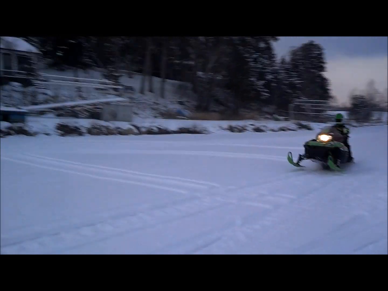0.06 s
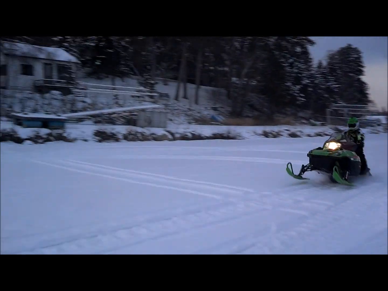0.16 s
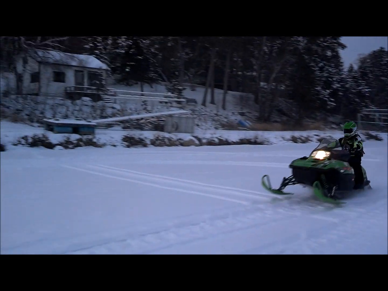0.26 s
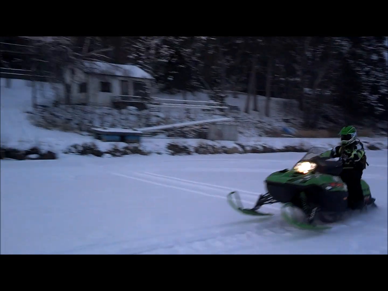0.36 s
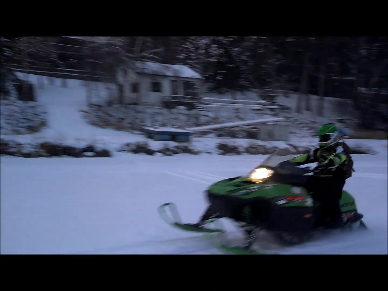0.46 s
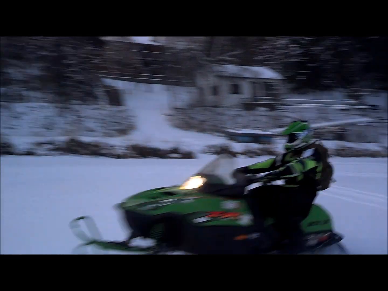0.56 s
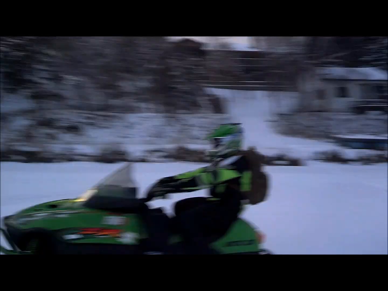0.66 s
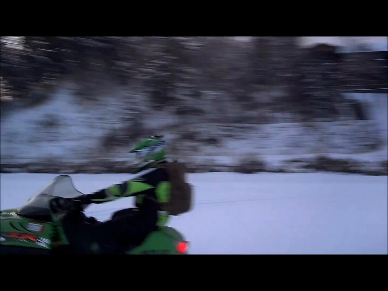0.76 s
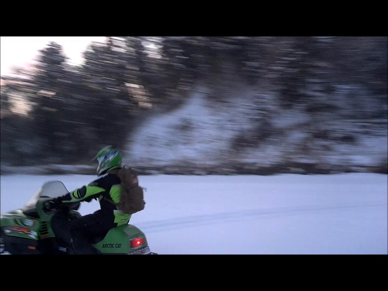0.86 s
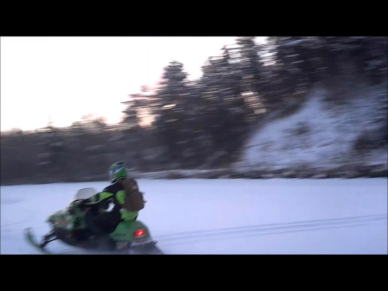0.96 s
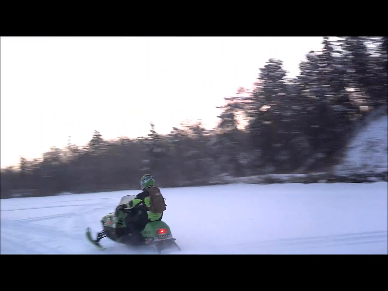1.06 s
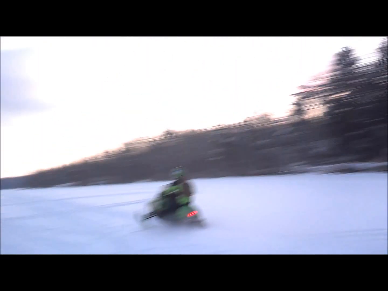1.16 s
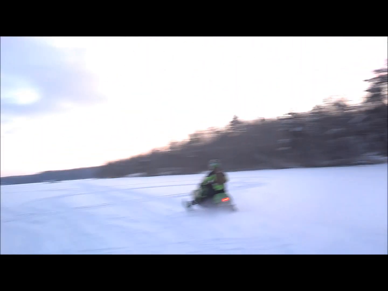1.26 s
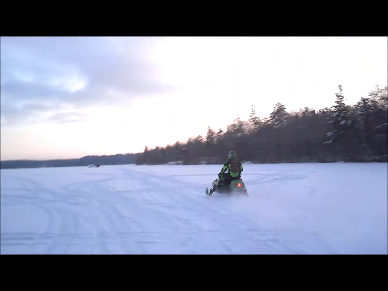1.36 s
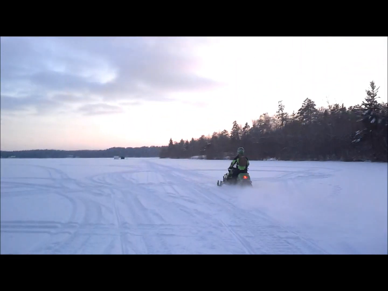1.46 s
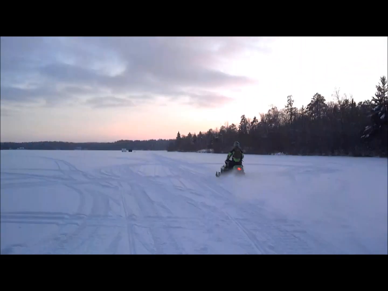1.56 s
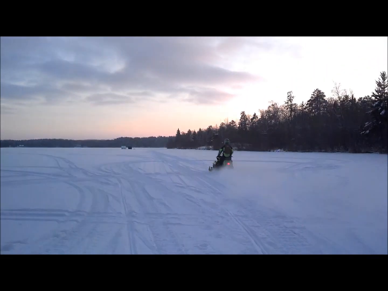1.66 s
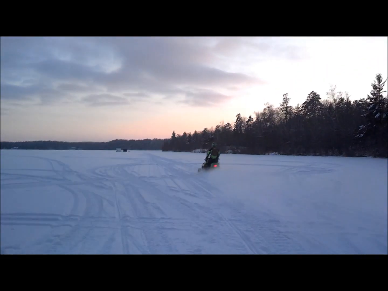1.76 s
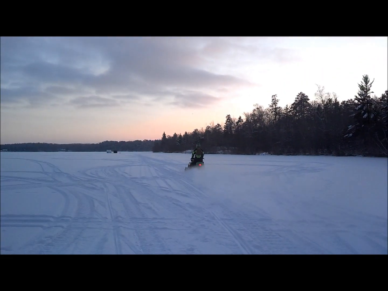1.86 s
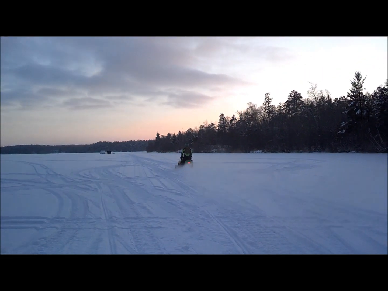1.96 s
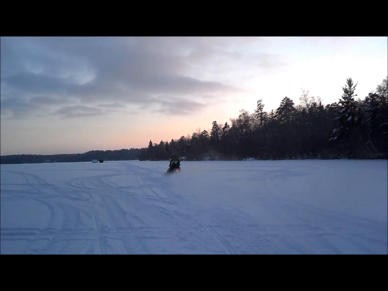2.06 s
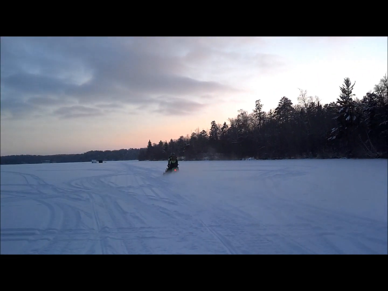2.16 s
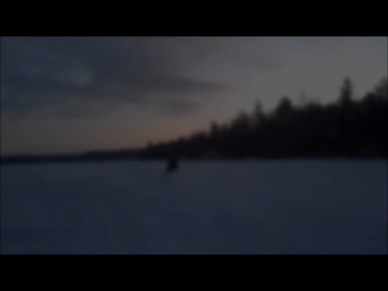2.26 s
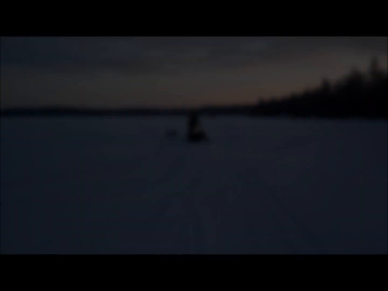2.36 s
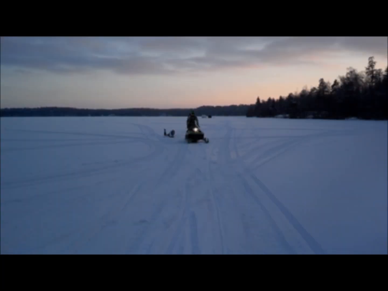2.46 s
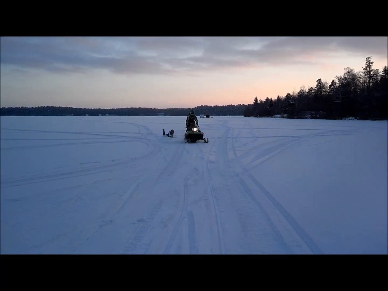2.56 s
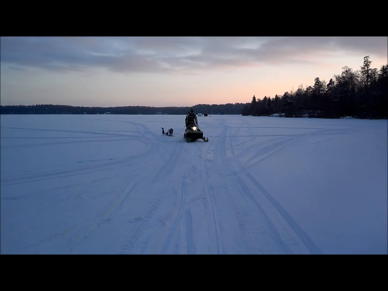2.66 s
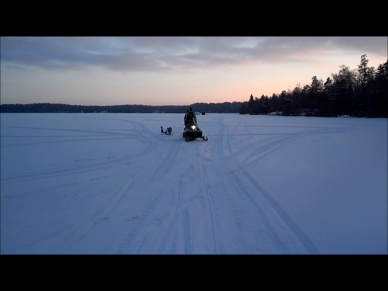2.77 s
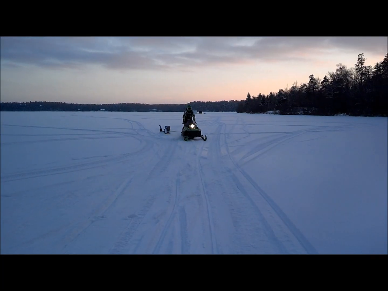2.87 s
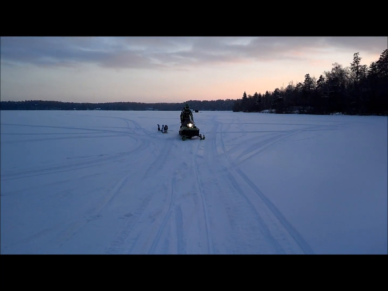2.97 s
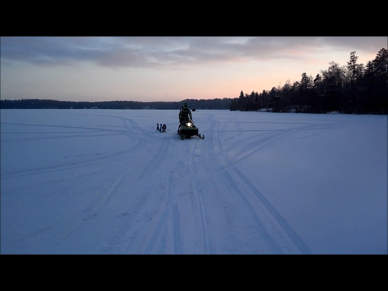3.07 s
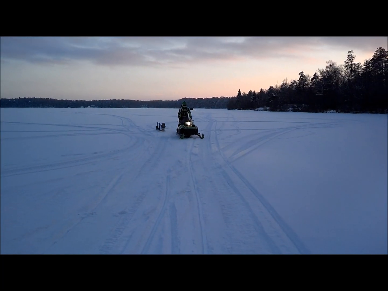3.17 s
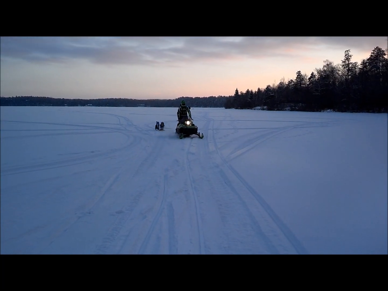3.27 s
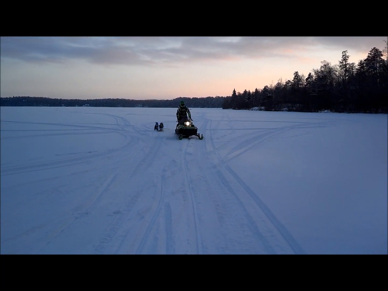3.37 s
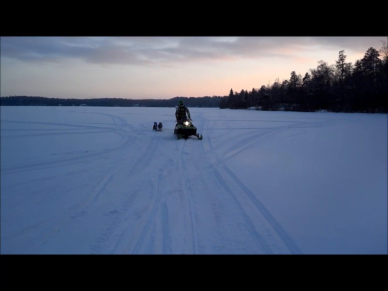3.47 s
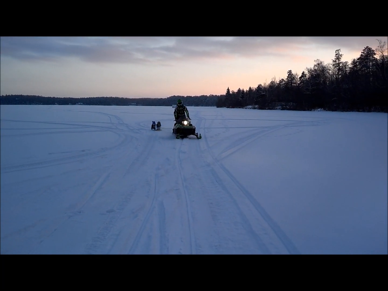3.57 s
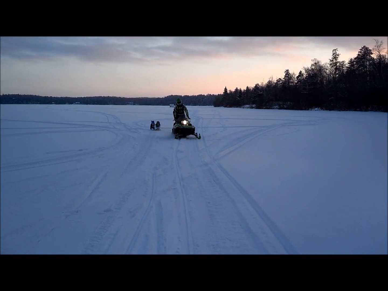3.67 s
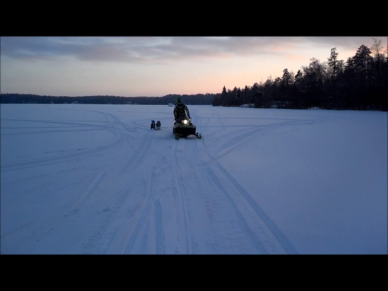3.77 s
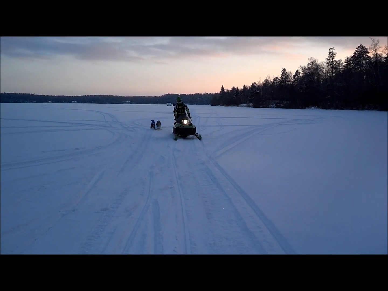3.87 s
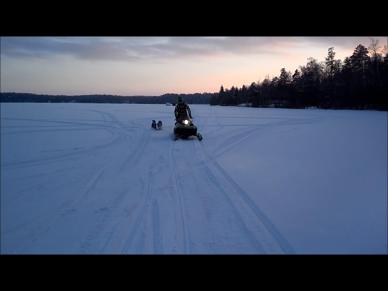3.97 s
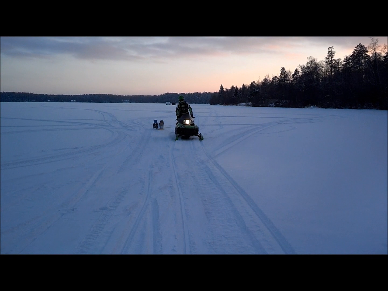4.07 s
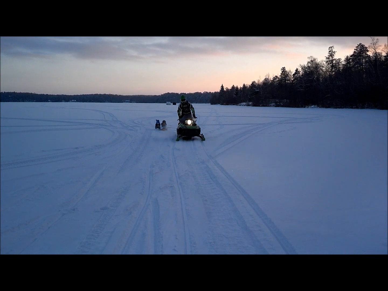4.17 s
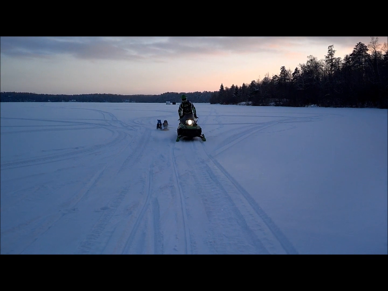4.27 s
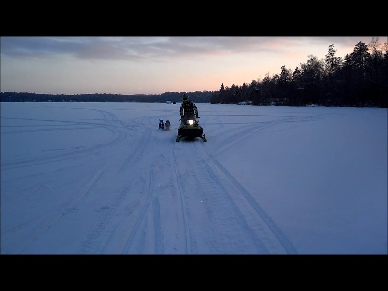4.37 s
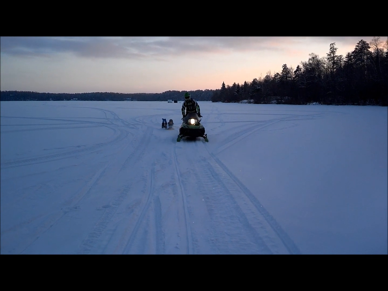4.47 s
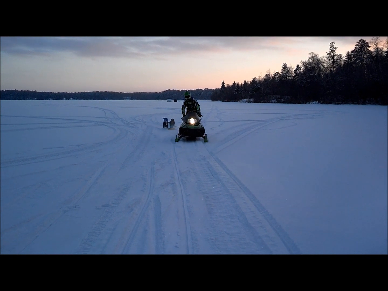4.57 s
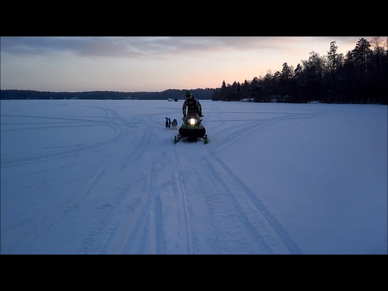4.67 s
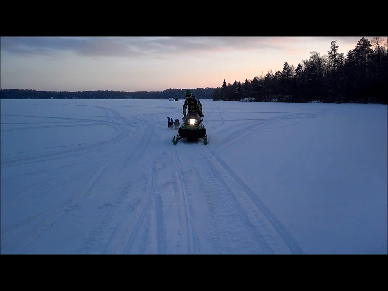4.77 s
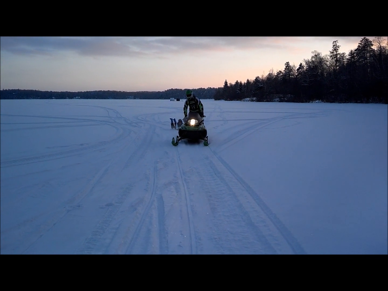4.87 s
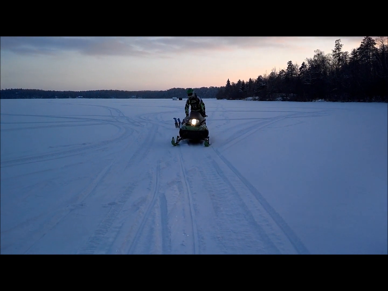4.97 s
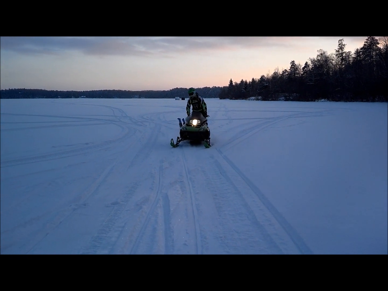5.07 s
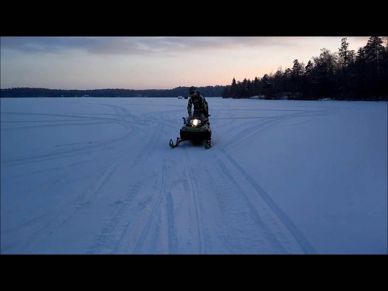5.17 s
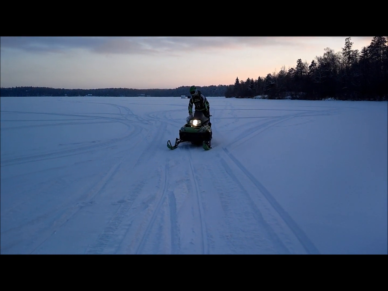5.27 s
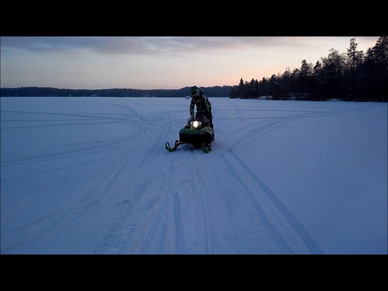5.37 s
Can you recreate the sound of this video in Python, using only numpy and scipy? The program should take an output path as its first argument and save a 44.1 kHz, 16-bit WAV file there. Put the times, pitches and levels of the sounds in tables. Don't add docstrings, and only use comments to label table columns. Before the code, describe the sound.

Raspy two-stroke snowmobile roars close by with spraying snow, runs down into the distance, then a hard cut to a lower, slightly stuttering engine hum.

```python
import sys
import numpy as np
from scipy import signal
from scipy.fft import rfft, irfft, next_fast_len
from scipy.io import wavfile

SR = 44100
rng = np.random.default_rng(int(sys.argv[2]) if len(sys.argv) > 2 else 0)


def convert_level_to_amplitude(level_db):
    exponent = np.asarray(level_db, float) / 20
    return 10 ** exponent


def unload_wav(signal):
    wavfile.write(
        sys.argv[1],
        SR,
        np.round(np.clip(np.atleast_2d(signal).T, -1, 1) * 32767).astype(np.int16),
    )


N = 239010
CHANGE_S = 2.297

# t/s, f/Hz
PASS_FIRING = [
    (0, 292.6),
    (.1, 291.2),
    (.4, 290.9),
    (.6, 287.7),
    (.7, 282.4),
    (.9, 269),
    (1.1, 260.5),
    (1.31, 254.4),
]
# approaching level/dB, faces from t/s, until t/s, facing level/dB, receding level/dB
OUTLETS = [
    (-32, 0.47, 0.58, -25.5, -29),
    (-41, 0.41, 0.68, -26.5, -38.5),
    (-28.5, 0.58, 0.74, -20.5, -37),
    (-26.5, 0.38, 0.69, -23.5, -38),
]
# order, level/dB against the near roar
BRIGHT_ORDERS = [(9, 2.5), (11, -2.5), (13, -1), (14.5, -12), (17, -6), (19, -8.5), (22, -9), (30, -17),
                 (38, -23)]
# f/Hz, level/dB per Hz
NEAR_ROAR = [(45, -93.5), (80, -66), (130, -71), (200, -58), (350, -60), (600, -68), (1000, -61),
             (1500, -70.5), (2300, -58), (3500, -59.5), (5500, -70), (8500, -71.5), (12000, -75),
             (15500, -74)]


def full_throttle():
    time, per_s = in_time(PASS_FIRING, tail_s=.1)
    steady_db, abreast_s, fall_db_per_s, wake_db = -31, 0.71, 27.5, -39.5
    near_db = np.clip(steady_db - fall_db_per_s * (time - abreast_s), wake_db, steady_db)
    swing_in_s, swing_out_s = 0.2, 0.24
    first_db, low_db, middle_db, upper_db = [
        np.interp(time, [s - swing_in_s, s, end, end + swing_out_s], [before, top, top, after])
        for before, s, end, top, after in OUTLETS]
    ice_dip_db = -5 * bell(time, centre_s=1.065, width_s=0.089)
    middle_db = middle_db + ice_dip_db
    upper_db = upper_db + ice_dip_db
    phase = turning(per_s, jitter=0.028)
    passed = np.interp(time, [.55, .75], [0, 1])
    abreast = np.interp(time, [.44, .56], [0, 1])
    receding = np.interp(time, [.72, .9], [0, 1])
    early = np.minimum(time, .4)

    pan_db = 9 - 17 * bell(time, centre_s=0.61, width_s=0.15)
    port_gain = convert_level_to_amplitude((pan_db - 12) * np.array([[.5], [-.5]]))
    lag = np.array([[0], [1.1]])
    boom = np.sqrt(2) * convert_level_to_amplitude(first_db + 2.5) * np.sin(phase - lag) * port_gain

    low = [(2, low_db - 3.5 + 9.5 * passed - 6 * (time > .87)),
           (3, low_db + 4.5 - 0.77 * passed),
           (4, middle_db - 5.0 + 14 * early - 4 * abreast),
           (5, middle_db + 5.5 - 11 * early + 3.3 * abreast),
           (6, upper_db + 3.5),
           (7, upper_db + 2.0 + 3 * abreast),
           (8, upper_db)]
    high = [(k, near_db - 2.2 * passed + at_hz(BRIGHT_ORDERS, k)) for k in range(9, 38)]
    halves = [(k + .5, near_db - 26 - 0.19 * k + 12 * passed + 11 * receding) for k in range(5)]
    cracks = orders(phase, low, waver_db=1.8, apart=0.43)
    cracks = cracks + orders(phase, high, waver_db=3.0, apart=0.021)
    cracks = cracks + orders(phase, halves, waver_db=4.0)
    cracks = cracks * convert_level_to_amplitude(1.08 * drift(130, size=len(time)))

    spray = roar(time, NEAR_ROAR, 2860, 5200, patchy_db=1.76, apart=0.032)
    hiss = convert_level_to_amplitude(near_db) * puffs(phase, depth=0.21) * spray
    engine = (boom + cracks) * fade(time, -1, 1.322, fade_s=0.012)
    return time, engine + hiss * fade(time, -1, 1.37, fade_s=0.22)


# t/s, f/Hz
TOW_FIRING = [(2.3, 151.8), (2.6, 152.8), (3.1, 154.6), (3.55, 156.2), (3.96, 155.5), (4.28, 152),
              (4.85, 151.6), (5.15, 153.5), (5.43, 154)]
# t/s, share of the boom lost [0-1]
WEAK_FIRINGS = [(2.373, 0.7), (2.554, .65), (2.647, 0.7), (2.711, 0.7), (2.841, .48), (2.959, 0.3),
                (3.017, 0.8), (3.085, .56), (3.143, .93), (3.241, 0.6), (3.384, 0.5), (3.498, 0.3),
                (3.691, .4), (3.87, .6), (4.142, .43), (4.199, .6), (4.252, 0.9), (4.301, .4), (4.42, .6),
                (4.535, 1), (4.607, 0.6), (4.658, .4), (4.736, 0.75), (4.79, 1), (4.855, .45), (4.906, 0.3),
                (4.998, 0.7), (5.2, 0.5), (5.296, 0.3)]
# order, level/dB against the 3rd
TOW_ORDERS = [(2, -10), (3, 1), (4, -10.5), (5, -11), (6, -7.5), (7, -12.5), (8, -27), (9, -7.5), (10, -6),
              (11, -6), (12, -7), (13, -9), (14, -10.5), (16, -20.5), (18, -57), (19, -14.5)]
# f/Hz, level/dB per Hz
COWL_ROAR = [(45, -80), (80, -68), (130, -63), (200, -51.5), (260, -72.5), (400, -73), (700, -70),
             (1100, -68), (1450, -61.5), (1700, -59), (1900, -64.5), (2200, -62.5), (2900, -86),
             (4000, -93)]
# f/Hz, level/dB per Hz
SKI_HISS = [(1500, -92), (2600, -79), (3500, -76), (5000, -82), (6000, -79.5), (8500, -88.5), (12000, -100),
            (15500, -122)]


def towing():
    time, per_s = in_time(TOW_FIRING, lead_s=.02)
    since = time - CHANGE_S
    boom_db = -24.5 + 0.17 * since
    third_db = -41.5 + 0.79 * since
    roar_db = -32.5 + 0.58 * since
    hiss_db = -49 + 1.05 * since
    rut_db = 3.5 * bell(time, centre_s=2.52, width_s=0.069)
    boom_db = boom_db - rut_db
    roar_db = roar_db + rut_db

    phase = turning(per_s, jitter=0.0064)
    firing = convert_level_to_amplitude(0.73 * drift(19, size=len(time)))
    for s, lost in WEAK_FIRINGS:
        start = max(round((s - time[0] - .06) * SR), 0)
        near = slice(start, round((s - time[0] + 0.053) * SR))
        x = ((time[near] - s) / 0.0078) ** 2
        firing[0, near] *= 1 - lost * (1.13 * np.exp(-x / 2) - 0.37 * np.exp(-x / 12))
    boom = np.sqrt(2) * convert_level_to_amplitude(boom_db + 1.5) * firing * np.sin(phase)
    stack = orders(phase, TOW_ORDERS[:5], waver_db=-0.3, apart=0.35)
    stack = stack + orders(phase, TOW_ORDERS[5:], waver_db=1.1, apart=0.38)
    stack = convert_level_to_amplitude(third_db + 3.0) * stack
    lugs = convert_level_to_amplitude(boom_db - 21) * orders(turning(per_s * 1.35, jitter=0.25), [(1, 0)], waver_db=2)
    cowl = roar(time, COWL_ROAR, 1060, 2450, patchy_db=0.75, apart=0.014)
    cowl = convert_level_to_amplitude(roar_db - 2.0) * puffs(phase, depth=0.11) * cowl
    skis = roar(time, SKI_HISS, 3444, 4330, patchy_db=0.64, apart=0.011)
    skis = convert_level_to_amplitude(hiss_db - 1.5) * puffs(phase, depth=0.092) * skis
    return time, (boom + stack + lugs + cowl + skis) * fade(time, CHANGE_S - .001, 9, fade_s=.001)


# t/s, f/Hz, level/dB
COAST = [
    (1.3, 255, -65),
    (1.34, 266, -59),
    (1.45, 225, -46.5),
    (1.6, 181, -46),
    (1.75, 179, -45),
    (1.95, 159, -42.5),
    (2.297, 173, -44),
]
# order, level/dB
COAST_ORDERS = [(1, 8), (2, -24)]


def coasting():
    return hum(COAST, COAST_ORDERS, jitter=0.29, waver_db=1.5)


# t/s, f/Hz, level/dB
CLUTCH = [
    (1.33, 792, -56),
    (1.39, 772, -38.5),
    (1.46, 726, -37),
    (1.52, 687, -49),
    (1.6, 642, -67),
]
# multiple, level/dB
CLUTCH_ORDERS = [(1, -1), (1.798, -1.5)]


def clutch_whine():
    return hum(CLUTCH, CLUTCH_ORDERS, jitter=0.2, waver_db=1.0)


# t/s, f/Hz, level/dB
TRACK = [
    (.2, 187, -55),
    (.6, 165, -38.5),
    (.95, 185, -34.5),
    (1.1, 174, -46.5),
    (1.3, 175, -36),
    (1.42, 166, -39),
    (1.8, 159, -43),
    (2.297, 155, -48.5),
]
# order, level/dB
TRACK_ORDERS = [(1, -2.5), (2, -1), (4, -14)]


def track_lugs():
    return hum(TRACK, TRACK_ORDERS, jitter=0.029, waver_db=2.5)


# t/s, peak level/dB, ring f/Hz, t60/s
KNOCKS = [
    (0.104, -44, 150, .06),
    (0.398, -30, 177, 0.058),
    (2.5, -32, 270, .07),
    (2.546, -31, 300, 0.055),
    (2.717, -15.5, 1570, 0.014),
    (4.043, -25, 1630, 0.019),
    (4.68, -31, 885, .06),
    (4.96, -28.5, 840, .06),
]


def knocks():
    out = np.zeros(N)
    for s, db, hz, t60 in KNOCKS:
        after = np.arange(round(t60 * SR)) / SR
        thud = convert_level_to_amplitude(db - 60 * after / t60) * np.sin(2 * np.pi * hz * after)
        out[round(s * SR):][:len(after)] += thud
    return np.arange(N) / SR, out


# t/s, f/Hz, level/dB
SHORE = [
    (1.25, 250, -47),
    (1.36, 256, -44),
    (1.5, 233, -49),
    (1.7, 243, -50),
    (2.297, 252, -62),
]
# order, level/dB
SHORE_ORDERS = [(1, 2.5), (3, -11), (5, -3.5), (6, 4), (7, -21), (8, -2)]


def far_shore():
    return hum(SHORE, SHORE_ORDERS, jitter=0.21, waver_db=3.5)


# f/Hz, level/dB per Hz
FAR_ROAR = [(45, -99), (80, -78), (130, -71), (200, -62.5), (300, -77.5), (600, -69), (1050, -71),
            (1440, -72.5), (1540, -64.5), (1650, -71.5), (2900, -72.5), (4000, -81), (8500, -88.5),
            (15500, -99.5)]


def far_roar():
    time = np.arange(round(.5 * SR), round(CHANGE_S * SR)) / SR
    top_db, from_s, fall_db_per_s, lake_db = -31.5, 0.82, 15.5, -46.5
    far_db = np.clip(top_db - fall_db_per_s * (time - from_s), lake_db, top_db)
    gate = fade(time, 0.41, 9, fade_s=0.34) * fade(time, -1, CHANGE_S, fade_s=0.0028)
    return time, convert_level_to_amplitude(far_db - 3.5) * gate * roar(time, FAR_ROAR, 1210, 1640, patchy_db=0.6, apart=0.03)


def splice():
    time = np.arange(round(CHANGE_S * SR), round(CHANGE_S * SR) + 2000) / SR
    return time, convert_level_to_amplitude(-24) * np.exp(-(time - CHANGE_S) / .003) * [[1], [-.3]]


def hum(rows, table, jitter, waver_db):
    time, per_s, level_db = in_time(rows)
    return time, convert_level_to_amplitude(level_db) * orders(turning(per_s, jitter), table, waver_db)


def orders(phase, table, waver_db, apart=0.27):
    out = 0
    for k, db in table:
        common, left, right = drift(6.85, size=len(phase), channels=3)
        slip = 0.5 * common + apart * np.array([left, -right])
        partial = np.sin(k * phase - 0.0713 * k * k + slip)
        out = out + np.sqrt(2) * convert_level_to_amplitude(db + waver_db * common) * partial
    return out


def roar(time, spectrum, low_hz, high_hz, patchy_db, apart):
    size = next_fast_len(len(time))
    hz = np.fft.rfftfreq(size, 1 / SR)
    common = rfft(rng.standard_normal(size))
    own = rfft(rng.standard_normal((2, size)))
    shaped = (common + apart * own) * convert_level_to_amplitude(at_hz(spectrum, hz))
    inside = (hz > low_hz) & (hz < high_hz)
    shaped /= np.sqrt(2 * np.sum(np.abs(shaped[0, inside]) ** 2)) / size
    together, *alone = drift(11.0, size=size, channels=12)
    octave = np.log2(hz / 60 + 1e-9)
    out = 0
    for k in range(-1, 10):
        band = irfft(shaped * np.clip(1 - np.abs(octave - k), 0, 1), size)
        out = out + convert_level_to_amplitude(patchy_db * (0.7 * together + alone[k + 1])) * band
    return out[:, :len(time)]


def puffs(phase, depth):
    return 1 + depth * np.cos(phase)


def turning(per_s, jitter):
    return 2 * np.pi * np.cumsum(per_s) / SR + jitter * drift(81, size=len(per_s))[0]


def drift(rate, size, channels=1):
    r = np.exp(-40 * np.pi * rate / SR)
    noise = rng.standard_normal((channels, N // 20 + 2002))
    slow = signal.lfilter([1], [1, -2 * r, r * r], noise)[:, 2000:]
    at = np.arange(size) / 20
    return np.array([np.interp(at, np.arange(len(row)), row / row.std()) for row in slow])


def in_time(rows, lead_s=0, tail_s=0):
    s, *columns = np.transpose(rows)
    end = min(round((s[-1] + tail_s) * SR), N)
    time = np.arange(round((s[0] - lead_s) * SR), end) / SR
    return [time] + [np.interp(time, s, c) for c in columns]


def at_hz(points, hz, axis=1):
    points = np.array(points)
    return np.interp(np.log(hz + 1e-9), np.log(points[:, 0]), points[:, axis])


def bell(time, centre_s, width_s):
    return np.exp(-((time - centre_s) / width_s) ** 2 / 2)


def fade(time, start_s, end_s, fade_s):
    return np.clip((time - start_s) / fade_s, 0, 1) * np.clip((end_s - time) / fade_s, 0, 1)


def add(out, time, sound):
    first = round(time[0] * SR)
    out[:, first:first + len(time)] += sound


def scene():
    out = np.zeros((2, N))
    for source in (full_throttle, towing, coasting, clutch_whine, track_lugs, knocks,
                   far_shore, far_roar, splice):
        add(out, *source())
    return out


# f/Hz, extra phase/rad, right-left level/dB
PORTS = [(40, -.2, 0), (150, -1.15, .5), (230, -1.8, -4), (280, -1.0, -8), (340, -.5, -6), (450, -.85, -2),
         (700, -1.2, -5), (950, -.9, -6), (1170, -.4, -.5), (1400, 0, .3), (1650, .2, 2), (1870, .2, 8),
         (2050, -.6, 2), (2600, 0, 0)]


def two_ports(pressure):
    widening_samples, cutoff_hz = 16, 15750
    size = next_fast_len(N + 4096)
    hz = np.fft.rfftfreq(size, 1 / SR)
    tilt_db = at_hz(PORTS, hz, axis=2)
    lag = at_hz(PORTS, hz) - 2 * np.pi * hz * widening_samples / SR
    left = convert_level_to_amplitude(np.minimum(-tilt_db, 0))
    right = -convert_level_to_amplitude(np.minimum(tilt_db, 0)) * np.exp(1j * lag)
    bass_cut = (hz / 30) ** 2 / (1 + (hz / 30) ** 2)
    response = np.array([left, right]) * (hz < cutoff_hz) * bass_cut
    return irfft(rfft(pressure, size) * response, size)[:, :N]


def roll_off(x):
    return signal.sosfilt(signal.butter(12, 17020, fs=SR, output="sos"), x)


def record(dry):
    squeezed = .75 * np.tanh(dry / .75)
    heard = two_ports(squeezed)
    return roll_off(heard)


dry = scene()
out = record(dry)
unload_wav(out)
```